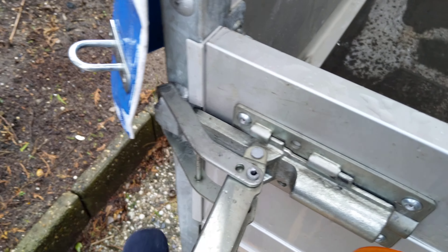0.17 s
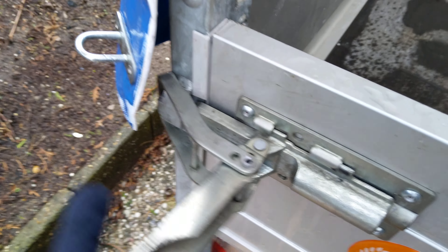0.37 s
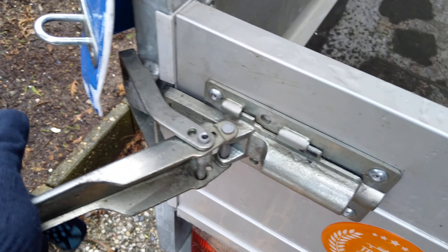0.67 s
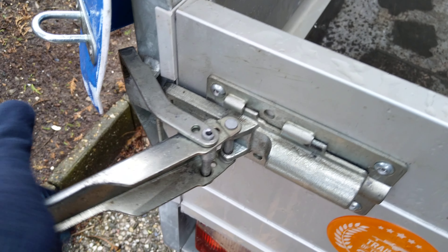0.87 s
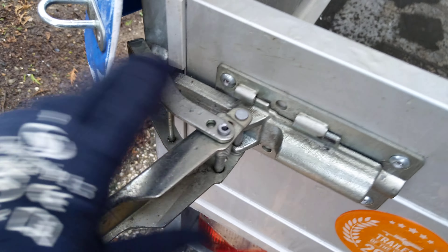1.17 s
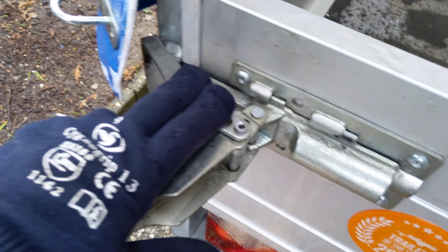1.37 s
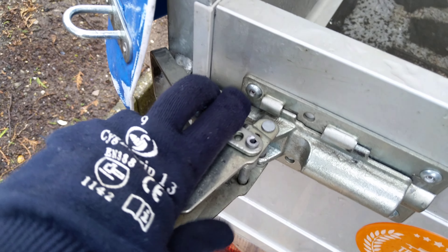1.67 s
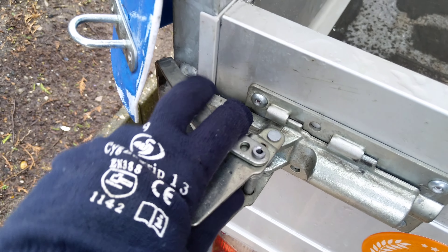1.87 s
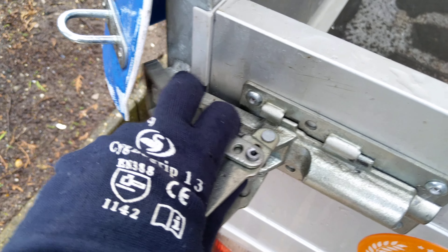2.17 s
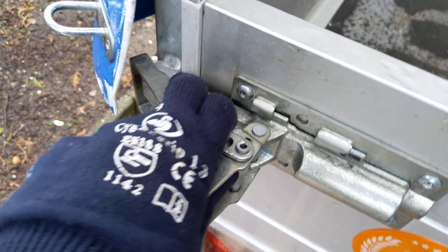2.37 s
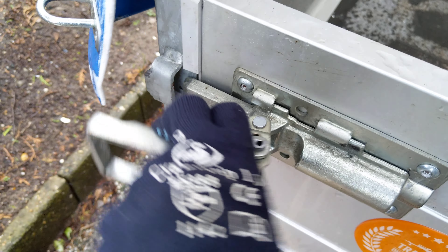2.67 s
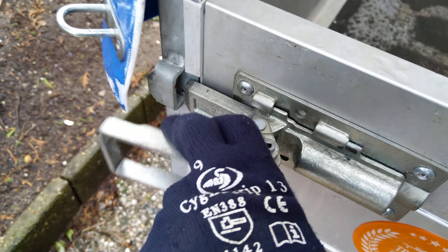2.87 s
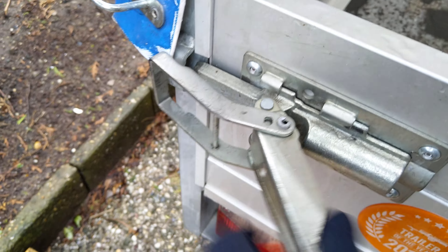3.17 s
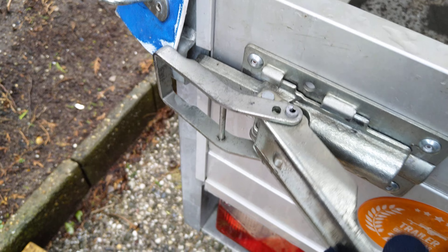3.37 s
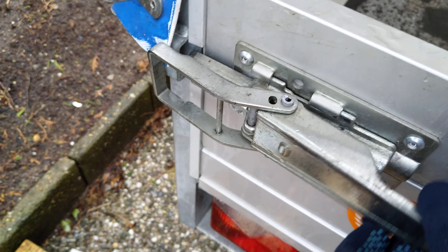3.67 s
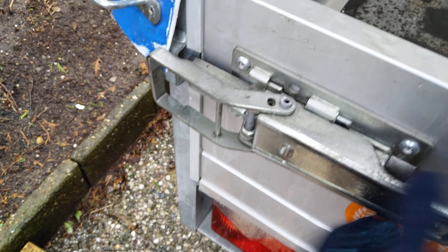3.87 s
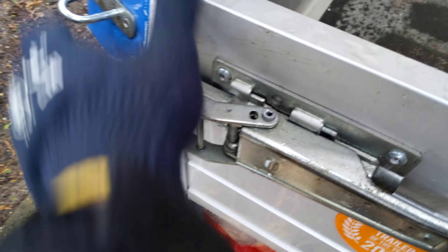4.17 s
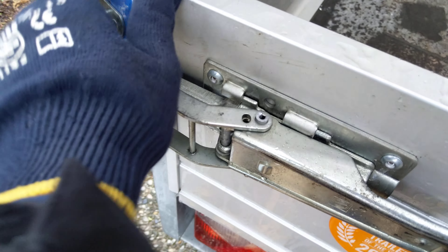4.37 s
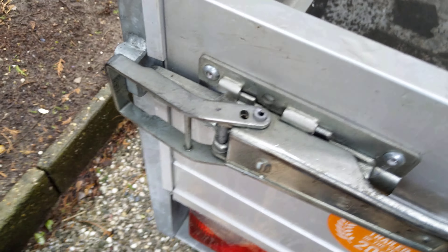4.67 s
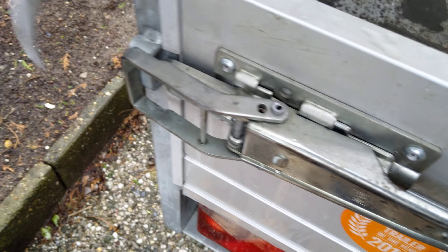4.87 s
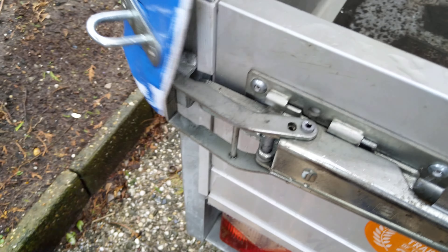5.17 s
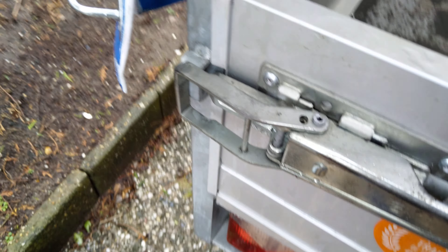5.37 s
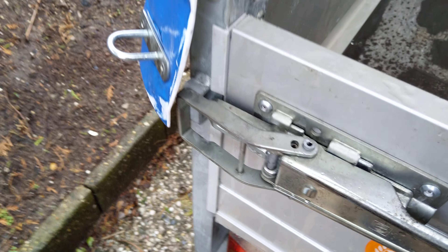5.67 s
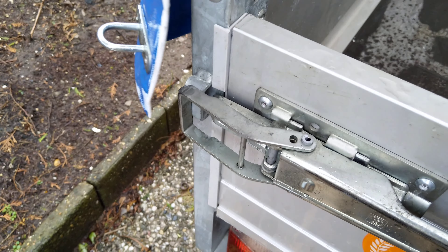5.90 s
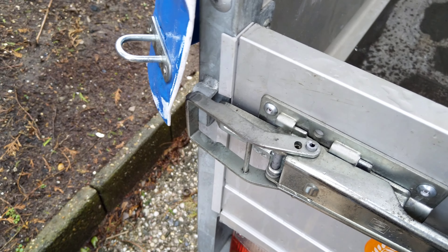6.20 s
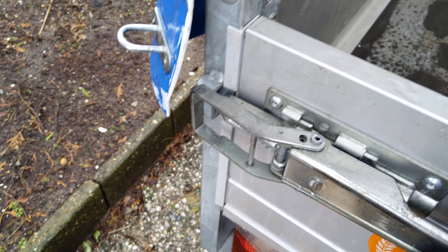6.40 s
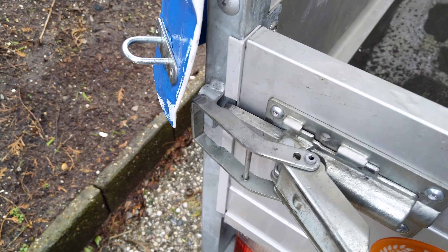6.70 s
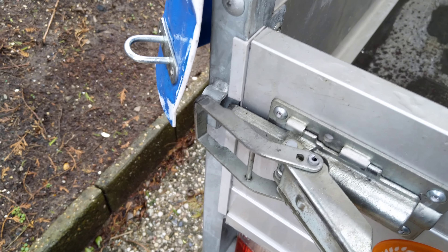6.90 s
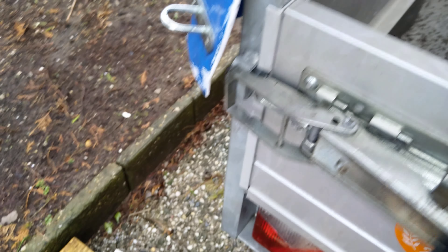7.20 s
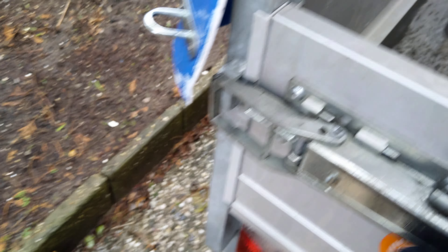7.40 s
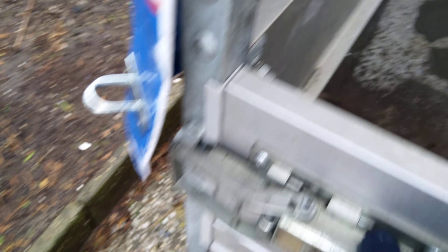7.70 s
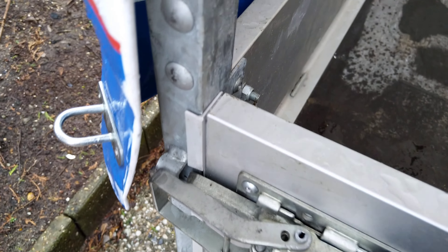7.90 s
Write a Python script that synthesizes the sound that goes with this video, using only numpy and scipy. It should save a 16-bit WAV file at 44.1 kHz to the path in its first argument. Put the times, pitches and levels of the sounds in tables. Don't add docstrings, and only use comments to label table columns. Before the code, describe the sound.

Outdoors, a steel latch on a trailer gate is handled very close to a handheld stereo microphone, over low town rumble, faint hiss and fine glove crackle. At 0.2 s a bright clack rings the gate and echoes from nearby walls; a duller one follows at 0.6. A lever rap sounds at 1.2, then fingers knock the microphone hard at 1.4. A heavy, dull shove and blow land at 2.1. Soft rubs and a lighter clunk come around 3.0, then a very loud, sharp echoing rap at 3.8. Small snaps lead to a bright clack near 4.55 and a stiff tarpaulin scraping over the rail from 4.6, fading by 5.0. From 5.1 to 7.1 there are loose snaps, ticks, small hinge squeaks, sleeve brushing and padded nudges. A soft push at 7.5 precedes the last loud, hard clack at 7.6, whose ring dies into quiet rumble by 8.

```python
import sys
import numpy as np
from scipy import signal
from scipy.fft import rfft, irfft, next_fast_len
from scipy.io import wavfile
from scipy.ndimage import uniform_filter1d, minimum_filter1d

SR = 44100
rng = np.random.default_rng(int(sys.argv[2]) if len(sys.argv) > 2 else 0)


def boost_factor(decibels):
    exponent = np.asarray(decibels, float) / 20
    return 10 ** exponent


def to_wav(sig):
    pcm = np.clip(np.atleast_2d(sig), -1, 1) * 32767
    pcm = np.round(pcm).astype(np.int16)
    wavfile.write(sys.argv[1], SR, pcm.T)


N = 354828
SIZE = 16384
LEAD = 512


def on_log(table, hz):
    f, v = np.transpose(table)
    return np.interp(np.log(np.maximum(hz, 1)), np.log(f), v)


def curves(table):
    s, *columns = np.transpose(table)
    return [np.interp(np.arange(N) / SR, s, c) for c in columns]


def bands(x, colour, edges):
    n = next_fast_len(x.shape[-1], real=True)
    hz = np.fft.rfftfreq(n, 1 / SR) + 1e-3
    spectrum = rfft(x, n) * boost_factor(on_log(colour, hz))
    below = [1 / (1 + (hz / e) ** 20) for e in edges]
    shares = [np.sqrt(np.maximum(b - a, 0)) for a, b in zip(below, below[1:])]
    return [irfft(spectrum * share, n)[..., :x.shape[-1]] for share in shares]


def diffuse(length):
    port_gap_m, sound_speed_m_s = 0.13, 343
    n = next_fast_len(length, real=True)
    alike = np.sinc(2 * np.fft.rfftfreq(n, 1 / SR) * port_gap_m / sound_speed_m_s)
    mid, side = rfft(rng.standard_normal((2, n))) * np.sqrt([(1 + alike) / 2, (1 - alike) / 2])
    return irfft(np.array([mid + side, mid - side]), n)[:, :length]


def walk(rate):
    k = int(SR / rate)
    held = np.repeat(rng.standard_normal(N // k + 1), k)
    return 1.74 * uniform_filter1d(uniform_filter1d(held, k), k)[:N]


def add(track, s, sound):
    i = int(s * SR)
    track[..., i:i + sound.shape[-1]] += sound[..., :N - i]


def ports(pan_db):
    return boost_factor(np.array([[pan_db], [-pan_db]]) / 2)


def fade(t, t60):
    return np.exp(-np.log(1000) * t / t60)


def ring(hz, t60, t, rise_s, rough, size=10):
    loosen_s, hold = 0.015, 16
    shape = np.broadcast(hz, t).shape
    flutter = rng.standard_normal(shape[:-1] + (shape[-1] // hold,))
    for _ in range(2):
        flutter = uniform_filter1d(flutter, size=size)
    flutter = uniform_filter1d(np.repeat(flutter / flutter.std(), hold, axis=-1), size=hold)
    swell = np.sin(np.pi / 2 * np.minimum(t / rise_s, 1)) ** 2
    unsteady = 1 + rough * flutter * np.minimum(t / loosen_s, 1)
    return np.sin(2 * np.pi * hz * t) * swell * fade(t, t60) * unsteady


# f/Hz, level/dB, t60/s
GATE = [(205, 6, .5), (288.5, 2, 0.49), (421.2, -5.5, 0.25), (490, -10, 0.19), (538, -5.5, 0.46),
        (568, -7, 0.25), (658, -8, 0.24), (804, -13, 0.2), (988, -0.5, 0.25), (1050, -7, 0.28),
        (1149, -10, 0.33), (1235, -1, 0.24), (1328, -10.5, 0.25)]
# f/Hz, level/dB per Hz
STEEL = [(35, -46), (60, -18.5), (189, -1.5), (363, -11), (553, 0.5), (882, -5), (1010, -2), (1700, -16.5),
         (2050, -12.5), (2410, -14.5), (2840, -13.5), (5210, -28), (5590, -30), (7400, -31), (16000, -72)]


def strike(rise_s, contact_s, levels_db, ring_db, edges):
    t = np.maximum(np.arange(SIZE) - LEAD, 0) / SR
    push = np.minimum(t / rise_s, 1) * np.exp(-(t / contact_s) ** 1.18)
    contact = (0.59 * rng.standard_normal(SIZE) + 0.81 * diffuse(SIZE)) * push
    parts = [boost_factor(db) * p / np.abs(p).max() for db, p in zip(levels_db, bands(contact, STEEL, edges))]
    even = bands(1. * (np.arange(SIZE) == LEAD), STEEL, edges)
    click = sum(e * p[0].std() / e.std() for e, p in zip(even, parts))

    hz, db, t60 = np.transpose(GATE)[:, :, None]
    level_chance, pitch_chance = rng.standard_normal((2, len(GATE), 1))
    which_band = np.searchsorted(edges, hz) - 1
    size = boost_factor(np.array(levels_db)[which_band] + 0.5 * db + ring_db + 3 * level_chance)
    hz = hz * (1 + 0.004 * pitch_chance)
    modes = (size * ring(hz, np.clip(t60, 0.03, 0.6), t, 0.0018, rough=0.52)).sum(axis=0)
    taper = signal.windows.tukey(SIZE, 2 * LEAD / SIZE)
    return (sum(parts) + modes) * taper, (click + modes) * taper


HIT_EDGES_HZ = (60, 400, 1450, 4150, 17000)
RAP_EDGES_HZ = (60, 400, 1550, 4850, 17000)
# t/s, peak level/dB,
# clang/dB, sizzle/dB, echo/dB
BLOWS = [
    (0.21, -12.5, 3.5, 4, 2),
    (0.587, -16.5, -12, -47, -5),
    (1.415, -14.5, -3, -8, -44),
    (2.059, -6.5, -11.5, -52, -5),
    (3.038, -21.5, -4.5, -6, -16),
    (3.837, -14, -29, -44, 5),
    (4.503, -24.5, 3, -4, -7),
    (4.564, -14.5, -4, -1.5, 0),
    (7.608, -5, 1, -19, -3),
]
# t/s, peak level/dB, clang/dB, sizzle/dB, echo/dB
RAPS = [
    (1.243, -10.5, -0.5, -31, -5.5),
    (1.257, -16, -12, -42, -5.5),
    (2.999, -24, -2, -13, -2.5),
    (3.837, -3.5, 2.5, -12, -5),
    (4.479, -21, -15, -22, 0),
    (5.47, -23, 5, 10, -11),
]
# t/s, peak level/dB, brightness/dB, echo/dB
SNAPS = [(0.711, -36, -1, -4), (1.392, -45, 1.5, -20), (2.524, -42, -2, -19), (3.047, -22, -8, -12),
         (1.323, -25, -8, -12), (4.205, -26, -8.5, -12.5), (4.362, -28.5, -8.5, -26),
         (5.27, -25.5, -14, -39), (5.307, -33, -2, -6), (5.606, -34.5, -5, 4.5), (5.714, -29, -3, -10.5),
         (6.519, -42.5, 14.5, -5), (6.544, -32, 2, -7), (6.825, -31, -13, -6)]


def clacks(near, far):
    hits = [(s, db, -9.5, clang, sizzle, echo_db, HIT_EDGES_HZ) for s, db, clang, sizzle, echo_db in BLOWS]
    hits += [(s, db, -22, clang, sizzle, echo_db, RAP_EDGES_HZ) for s, db, clang, sizzle, echo_db in RAPS]
    hits += [(s, db, -18.5, bright, bright - 4.5, echo_db, HIT_EDGES_HZ) for s, db, bright, echo_db in SNAPS]
    for s, db, boom, clang, sizzle, echo_db, edges in hits:
        contact_s = 0.0044 * boost_factor(0.12 * (db + 9.5) + 0.1 * min(echo_db + 5, 0))
        levels_db = (db + boom, db, db + clang, db + sizzle)
        hit, click = strike(0.0003, contact_s, levels_db, ring_db=-19 + min(echo_db, 0), edges=edges)
        add(near, s + 0.0008 - LEAD / SR, hit * ports(0.95))
        add(far, s - LEAD / SR, click * boost_factor(echo_db))


# t/s, peak level/dB, boom/dB, brightness/dB, contact/s
SHOVES = [(0.015, -34.5, 1.5, -14, 0.028), (0.456, -49, 17, -13.5, 0.035), (0.599, -30, 7.5, -21, 0.027),
          (2.059, -4, -6.5, -24, 0.025), (2.361, -22.5, -2, -30, 0.041), (2.469, -32.5, -6, -10.5, 0.012),
          (2.523, -33.5, 4, -11, 0.038), (3.009, -28, -3.5, -12.5, 0.078), (3.044, -22.5, 8.5, -12.5, 0.04),
          (3.063, -28, -6, -6, 0.022), (3.087, -31, 11.5, -5.5, 0.023), (4.544, -28, -3, -24, 0.014),
          (5.128, -28.5, -11, -12, 0.042), (5.142, -34, -10, -22, 0.048), (5.747, -50, -20, 10.5, 0.035),
          (5.872, -36, -18, 1.5, 0.044), (6.271, -32.5, -1.5, -7, 0.041), (6.379, -37, -33, -8, 0.034),
          (6.71, -29, -18, -9.5, 0.026), (6.868, -38, 0, -30, 0.036), (7.079, -45.5, 0.5, -18, 0.087),
          (7.482, -22, -3.5, -39, 0.034)]


def shoves(near, far):
    for s, db, boom, clang, contact_s in SHOVES:
        sizzle = -0.5 + 1.42 * clang
        levels_db = (db + boom, db, db + clang, db + sizzle)
        hit, _ = strike(0.0007, max(contact_s, 0.004), levels_db, ring_db=-22, edges=HIT_EDGES_HZ)
        add(near, s - LEAD / SR, hit)
        add(far, s - LEAD / SR, hit[0] * boost_factor(-7.0))


# t/s, f/Hz, level/dB, t60/s
RINGS = [(.210, 5700, -10, 0.073), (.210, 2035, -15, 0.32), (.212, 2210, -17, .25),
         (.215, 762, -22.5, 0.39), (0.211, 7560, -26, 0.03), (.588, 1500, -18.5, 0.047),
         (.588, 3020, -36.5, 0.1), (0.599, 187, -23, 0.2), (1.243, 3225, -20, 0.059),
         (1.242, 4400, -36, 0.19), (1.245, 3710, -40.5, 0.13), (2.062, 3204, -22, 0.058),
         (4.477, 1386, -24, 0.05), (5.135, 743, -30, 0.16), (2.060, 985, -5, 0.07),
         (2.07, 129.3, -25.5, 0.69), (2.75, 191, -41.5, 0.96), (2.996, 1126, -21, 0.038),
         (3.044, 196, -33, .3), (3.836, 1068, -8, 0.073), (3.834, 1378, -6.5, 0.051),
         (3.845, 538, -30, 0.99), (3.849, 205, -19, 0.48), (3.841, 3405, -32, 0.7),
         (3.840, 6800, -23, 0.027), (4.563, 5780, -20, 0.016), (5.139, 280, -27.5, 0.42),
         (7.609, 1275, -2, 0.06), (7.608, 3450, -14, 0.023), (7.607, 2330, -19, 0.04),
         (7.61, 3488, -33, 0.18), (7.61, 2401, -35, 0.33), (7.61, 1050, -15.5, 0.24),
         (7.61, 1884, -27, 0.24), (7.61, 2562, -35, 0.43), (3.84, 2789, -28, 0.48), (3.84, 3531, -27, 0.14),
         (3.841, 3203, -33, 0.55), (3.839, 3876, -26, 0.21), (3.842, 6800, -38, 0.27),
         (2.061, 3203, -53, 0.24), (2.062, 2239, -36, .5), (2.062, 658, -19, 0.31), (2.062, 420, -19, 0.28),
         (.212, 2772, -27.5, .26), (0.71, 2950, -32.5, .04), (0.713, 2400, -44.5, 0.15),
         (3.046, 490, -24.5, 0.21), (3.048, 571, -25.5, 0.41), (1.242, 1400, -12.5, 0.054)]


def ringing_parts(near, far):
    t = np.arange(SIZE) / SR
    for s, hz, db, t60 in RINGS:
        rough = min(0.5 + hz / 6000, 1.0)
        part = ring(hz, max(t60, 0.01), t, 2 / hz, rough, size=int(4 + 9000 / hz))
        part = part * np.linspace(1, 0, SIZE) * boost_factor(db - 2)
        lag = int(5 * rng.standard_normal())
        add(near[0], s + max(lag, 0) / SR, part)
        add(near[1], s - min(lag, 0) / SR, part)
        add(far, s, part * boost_factor(-11.5))


def latch():
    near, far = np.zeros((2, N)), np.zeros(N)
    clacks(near, far)
    shoves(near, far)
    ringing_parts(near, far)
    return near, far


# t/s, level/dB
SCRAPE = [
    (4.572, -28),
    (4.602, -22),
    (4.676, -21.5),
    (4.876, -44.5),
    (5.01, -66),
    (5.02, -69),
]
# f/Hz, width/Hz, level/dB, fade/dB per s
SCRAPE_PEAKS = [(2600, 180, 4.5, 40), (3480, 440, -3.5, 24), (5050, 330, 2.5, -3), (6620, 160, -1.5, 5),
                (8050, 250, -8, 20)]


def scrape():
    db = curves(SCRAPE)[0]
    t = np.arange(N) / SR
    start_s, stop_s = SCRAPE[0][0], SCRAPE[-1][0]
    since = np.clip(t - start_s, 0, 1)
    dull_db = -6 - 0.7 * (-22.5 - db)
    bright_db = -10 - 55 * since
    top_db = -19 - 130 * since

    moving = np.clip((t - start_s) / 0.022, 0, 1) * (t < stop_s)
    grains = diffuse(N) * boost_factor(0.99 * walk(250) + 0.3 * walk(60)) * moving
    colour = [(200, -8), (500, 3.5), (1200, 1.5), (8300, -4.5), (9200, -14.0), (16000, -19.0)]
    dull, body, bright, top = bands(grains, colour, (200, 1700, 8800, 12500, 17000))
    rings = 0
    for hz, width_hz, gain_db, fade_db_s in SCRAPE_PEAKS:
        peak = signal.iirpeak(hz, hz / max(3 * width_hz, 400), SR)
        rings = rings + boost_factor(gain_db - fade_db_s * since) * signal.lfilter(*peak, body)

    def unit(x):
        return x / np.sqrt(np.mean(x[:, int(4.6 * SR):int(4.9 * SR)] ** 2))

    shares = boost_factor(dull_db) * unit(dull) + boost_factor(bright_db) * unit(bright) + boost_factor(top_db) * unit(top)
    return boost_factor(db) * (unit(0.08 * body + rings) * ports(4.4) + shares)


# t/s, peak level/dB, f/Hz, t60/s
BUMPS = [
    (0.455, -34, 67.6, 0.14),
    (1.087, -20, 59.6, 0.091),
    (1.107, -22.5, 57.4, 0.2),
    (1.419, -11, 62, 0.04),
    (3.242, -27, 66.5, 0.14),
]


def bumps():
    out, t = np.zeros(N), np.arange(SIZE) / SR
    for s, db, hz, t60 in BUMPS:
        add(out, s, -boost_factor(db) * np.sin(2 * np.pi * hz * t) * fade(t, max(t60, 0.02)))
    return out


def knock():
    knock_s, rise_s, fall_s = 1.4183, 0.0015, 0.001
    t = np.arange(N) / SR - knock_s
    pull = (t < 0) * (0.31 * np.exp(np.minimum(t, 0) / 0.0036) - 0.59 * (t > -rise_s))
    back = (t >= 0) * np.exp(-np.maximum(t, 0) / fall_s)
    return boost_factor(-5) * uniform_filter1d(pull + back, size=14)


# t/s, peak level/dB, centre f/Hz, left minus right/dB, wide click/dB
EDGES = [(0.21, 0, 5550, -13, -31), (1.2052, -34, 14600, 1, 0), (1.4163, -29, 7040, -10.5, -6),
         (1.8492, -26, 6900, 15, -11), (4.5042, -17, 3620, 5, -32), (4.479, -26, 1300, 3, -30),
         (3.8365, -6, 3300, 0, -30), (3.8385, -5, 1300, 0, -30), (7.6082, -7, 3300, 0, -32),
         (.588, -22, 1500, 0, -30), (5.4708, -24, 2500, 2, -14), (1.243, -14, 1500, 0, -30),
         (4.626, -11, 2600, 4, -12), (3.037, -28, 5900, -1.5, -14), (3.8363, -21, 6860, 4, -24),
         (3.8404, -7.5, 6670, 8, -22), (4.5643, -8, 5850, 8, -9), (5.4713, -20, 5500, 3, -19),
         (7.6074, -18.5, 6740, 11, -38)]
# t/s, peak level/dB
SEAMS = [(0.833, -40), (0.9627, -40), (1.035, -35), (1.0525, -30.5), (1.1133, -31), (1.617, -42),
         (1.697, -39.5), (1.7748, -30), (2.0303, -38), (2.193, -40), (2.2997, -32), (2.448, -35.5),
         (2.524, -42), (2.804, -43), (3.582, -38), (4.04, -44), (5.748, -40.5), (3.652, -35.5),
         (3.9953, -40), (4.022, -37), (4.2066, -41), (5.539, -35), (6.522, -40), (6.795, -41), (7.228, -40),
         (7.3652, -34), (7.9117, -41)]


def ticks():
    out, t = np.zeros((2, N)), np.arange(400) / SR
    chance = rng.standard_normal((len(SEAMS), 2))
    seams = [(s, db, 6800 + 1600 * a, 11 + 4 * b, -11.5) for (s, db), (a, b) in zip(SEAMS, chance)]
    for s, db, hz, pan_db, click_db in EDGES + seams:
        click = np.diff(rng.standard_normal((2, 401))) * boost_factor(click_db)
        snap = (click + np.sin(2 * np.pi * hz * t)) * np.exp(-t / 0.0008)
        add(out, s, boost_factor(db - 3) * snap * ports(np.clip(pan_db, -8, 8)))
    return out


# t/s, length/s, f/Hz, level/dB
SQUEALS = [
    (0.34, 0.106, 1600, -62),
    (2.775, 0.081, 2420, -58.5),
    (2.78, 0.069, 2750, -66),
    (5.65, 0.061, 550, -53),
    (5.04, 0.066, 1150, -54),
    (5.03, 0.054, 560, -55),
    (5.875, 0.044, 4700, -51),
    (5.75, 0.06, 3900, -55),
]


def squeals():
    out, t = np.zeros(N), np.arange(SIZE) / SR
    for s, length_s, hz, db in SQUEALS:
        tone = ring(hz, 9., t, 0.001, rough=3, size=int(3 + 8000 / hz))
        add(out, s, boost_factor(db) * tone * np.sin(np.pi * np.minimum(t / length_s, 1)))
    return out


# f/Hz, t60/s
WALLS_T60 = [(100, 0.34), (300, 0.3), (1000, 0.36), (3000, 0.28), (8000, 0.48), (16000, 0.12)]


def walls(x):
    n = 2 * SIZE
    t = np.arange(n) / SR
    edges = 50 * 2 ** np.arange(9.)
    parts = bands(diffuse(n), [(20, 0.011), (20000, 0.017)], np.append(edges, 20000))
    tail = sum(p * fade(t, on_log(WALLS_T60, 1.42 * e)) for p, e in zip(parts, edges))
    tail = tail * np.clip((t - 0.004) / 0.011, 0, 1)
    return signal.fftconvolve(x[None], tail / np.sqrt(np.sum(tail[0] ** 2)), axes=1)[:, :N]


def swells(table, rest_db):
    t, power = np.arange(0, N + 64, 64) / SR, boost_factor(rest_db) ** 2
    for s, db, rise_s, fall_s in table:
        away = np.abs(t - s) / np.maximum(np.where(t < s, rise_s, fall_s), 0.01)
        power = power + boost_factor(db - 10 * away ** 1.58) ** 2
    return np.interp(np.arange(N) / SR, t, 10 * np.log10(power))


UNDER_EDGES_HZ = (15, 135, 1550, 4300, 17000)
# f/Hz, level/dB per Hz
QUIET = [(15, -40), (25, -1.5), (71, 15), (136, -8.5), (210, -11), (291, -13.5), (460, -13), (501, -12),
         (983, -8.5), (1450, -20), (2500, -17), (4500, -28), (5850, -6), (9900, -120)]
# f/Hz, level/dB per Hz
SLEEVE = [(2350, -25), (4000, -5.5), (4600, -1.5), (5900, -6), (6740, -0.5), (7840, -3.5), (10300, -15),
          (13000, -15.5), (15200, -28), (16000, -35)]
# t/s, level/dB
RUMBLE = [(0.0, -35), (0.11, -46), (0.31, -39.5), (0.6, -38.5), (0.83, -48), (1.27, -40), (1.41, -55),
          (2.22, -41), (2.38, -51.5), (3.05, -41.5), (3.5, -47), (3.68, -48), (3.85, -61.5), (4.05, -49.5),
          (4.82, -55), (5.4, -50), (6.43, -50.5), (8.05, -54.5)]
# peak t/s, peak level/dB, rise/s per 10 dB, fall/s per 10 dB
MURMURS = [(0.01, -41.5, 26, 0), (.31, -39.5, 0.23, 0.02), (.56, -43.5, 0.44, 0.1), (1.03, -48, 0.3, 0.5),
           (1.27, -37.5, 0.03, 0.1), (1.8, -47.5, 0.06, 0.1), (2.8, -44.5, 1, -0.5), (3.5, -48, 1.4, 1.2),
           (3.85, -45.5, 0, 0.54), (4.33, -45, 0, -1.3), (4.7, -48, -0.54, 0.63), (5.35, -47.5, 0.4, 0.3),
           (6.43, -48, 0.7, 0.7), (7.35, -45.5, 0.05, -0.5), (8.04, -47, 0.7, 3)]
# peak t/s, peak level/dB, rise/s per 10 dB, fall/s per 10 dB
RUBS = [(.31, -40.5, 0.13, 0.04), (.69, -57, 1, 0.5), (1.27, -55, 0.8, .11), (1.8, -51.5, 0.25, 0.9),
        (3.5, -54, 0.3, -1.3), (3.9, -50.5, 0.3, .5), (4.63, -37, 0.04, -0.07), (5.08, -49, 0.04, 0.43),
        (5.9, -53.5, 1.2, 0.5), (6.72, -54, 1.5, 0.22), (7.55, -58.5, 0.5, 11)]
# peak t/s, peak level/dB, rise/s per 10 dB, fall/s per 10 dB
BRUSHES = [(.31, -55.5, 0.2, 0.1), (1.21, -57.5, 0.26, -0.06), (1.82, -59, 0.16, .6),
           (3.2, -57.5, 0.13, 0.4), (3.85, -51.5, 0.35, 0.3), (4.75, -51.5, 0.14, 0.11),
           (5.06, -58, 0.1, 0.12), (5.62, -51, 0.2, 0.1), (6.26, -47, 0.17, 0.17), (7.29, -54, 0.1, 0.13)]


def under():
    noise = diffuse(N)
    parts = bands(noise, QUIET, UNDER_EDGES_HZ[:-1]) + bands(noise, SLEEVE, UNDER_EDGES_HZ[-2:])
    flicker_db = (1.6 * walk(8), 1.8 * walk(25), 1.8 * walk(30), 1.4 * walk(60))
    levels = curves(RUMBLE) + [swells(MURMURS, -54.5), swells(RUBS, -61), swells(BRUSHES, -64)]
    return sum(boost_factor(db + f + 1) * p / p.std() for db, f, p in zip(levels, flicker_db, parts))


# t/s, level/dB
CRACKLE = [(0, -86), (.7, -70), (1.2, -62.5), (2.2, -68), (3, -69), (4.4, -74), (5.5, -79), (6.5, -76),
           (8.05, -85)]


def crackle():
    crackles_per_s, hiss_db = 38, -67.5
    where, size = rng.random(N) < crackles_per_s / SR, boost_factor(12 * rng.random(N))
    pricks = signal.lfilter([1], [1, -0.975], where * size) * boost_factor(curves(CRACKLE)[0] + 14.5)
    noise = diffuse(N) * (pricks * ports(2.5) + boost_factor(hiss_db + 1.2 * walk(12)))
    colour = [(4000, -12), (7000, -16), (10000, -9.0), (14000, -1.5), (16000, 0)]
    return bands(noise, colour, (4000, 17000))[0]


def scene():
    near, far = latch()
    cloth, snaps = scrape(), ticks()
    echo = walls(far + boost_factor(-8.5) * cloth[0] + boost_factor(-25) * snaps[0])
    return near + cloth + snaps + echo + bumps() + knock() + squeals() + under() + crackle()


def roll_off(x):
    return signal.sosfilt(signal.butter(12, 16630, fs=SR, output="sos"), x)


def record(dry):
    top_hz, ceiling = 15780, 0.97
    low_pass = signal.ellip(10, 0.1, 40, top_hz, fs=SR, output="sos")
    below = signal.sosfiltfilt(low_pass, dry)
    sound = below + boost_factor(-33) * (dry - below)
    room_left = ceiling / np.maximum(np.abs(sound).max(axis=0), ceiling)
    gain = minimum_filter1d(room_left, size=241)
    gain = uniform_filter1d(uniform_filter1d(gain, size=120), size=120)
    return roll_off(sound * gain)


dry = scene()
out = record(dry)
to_wav(out)
```